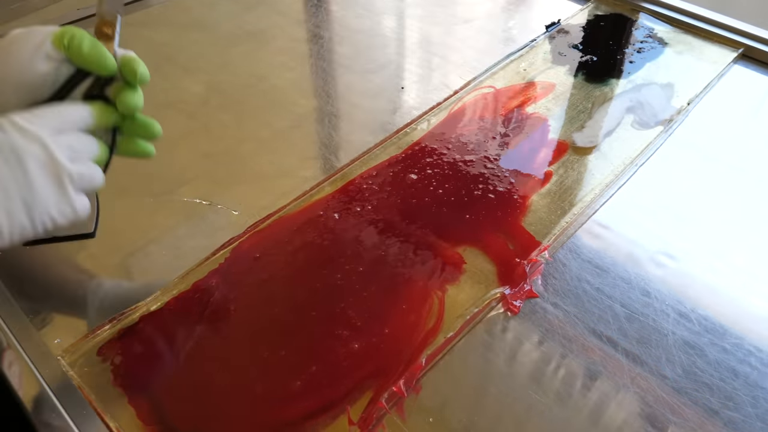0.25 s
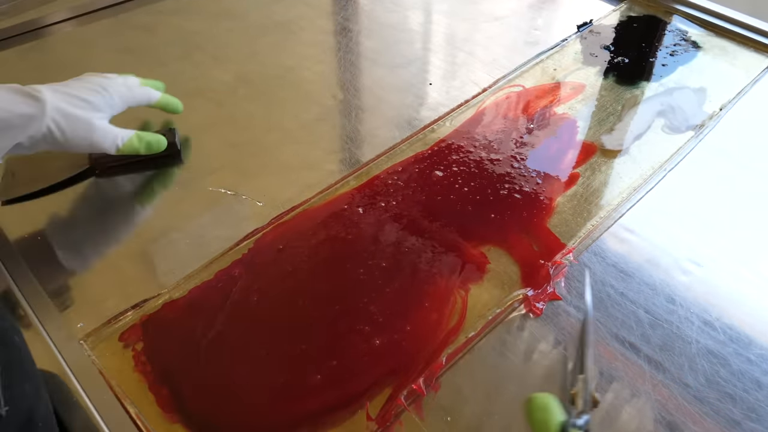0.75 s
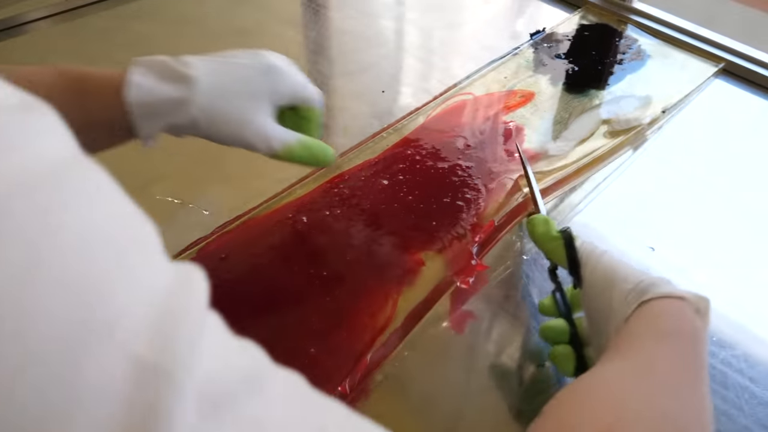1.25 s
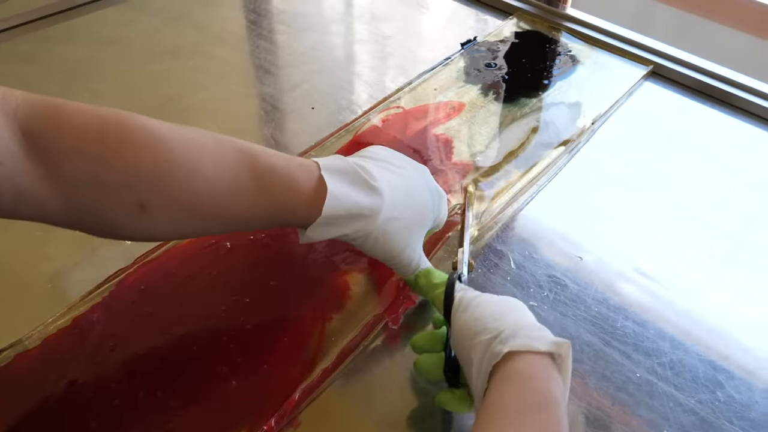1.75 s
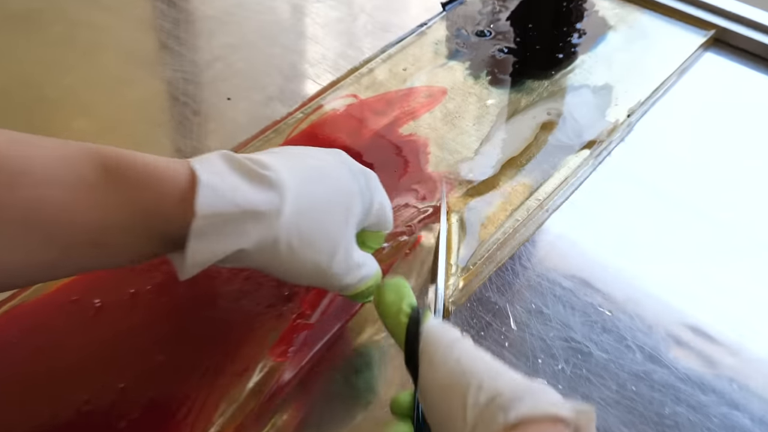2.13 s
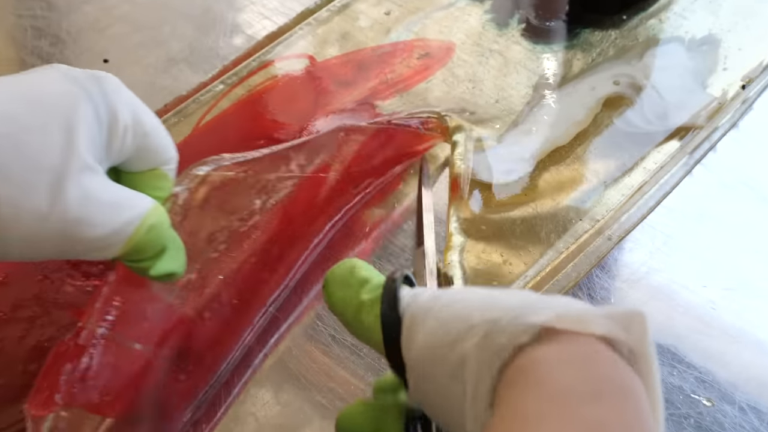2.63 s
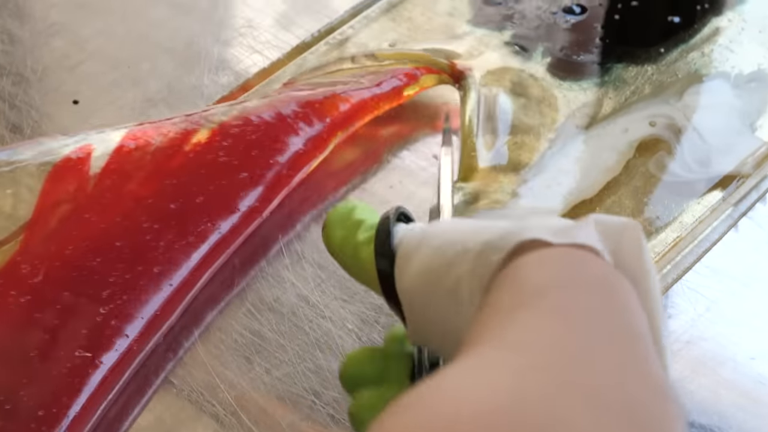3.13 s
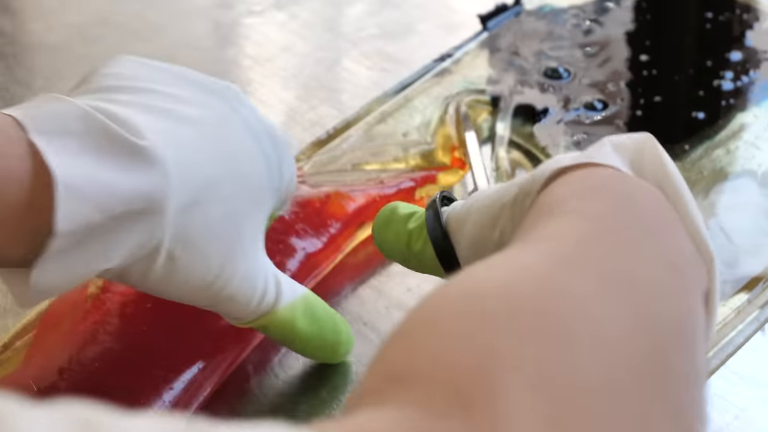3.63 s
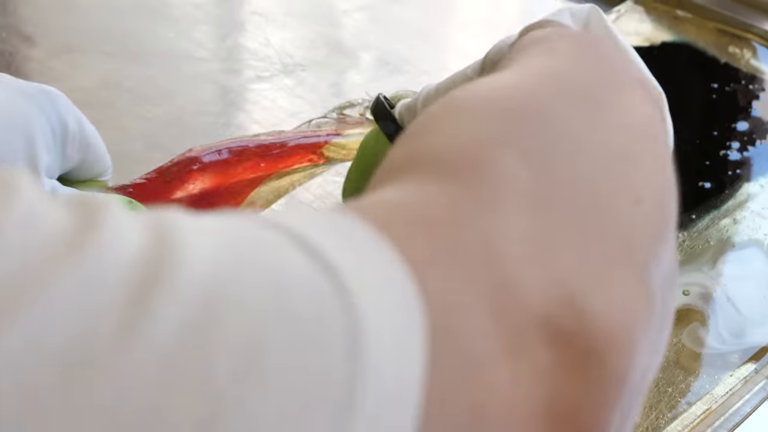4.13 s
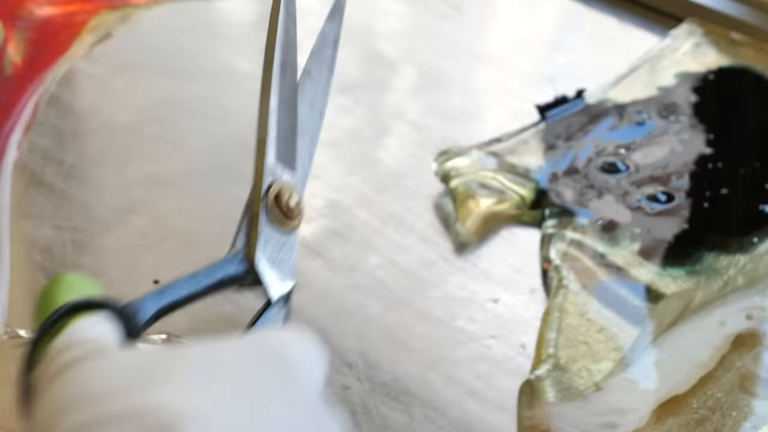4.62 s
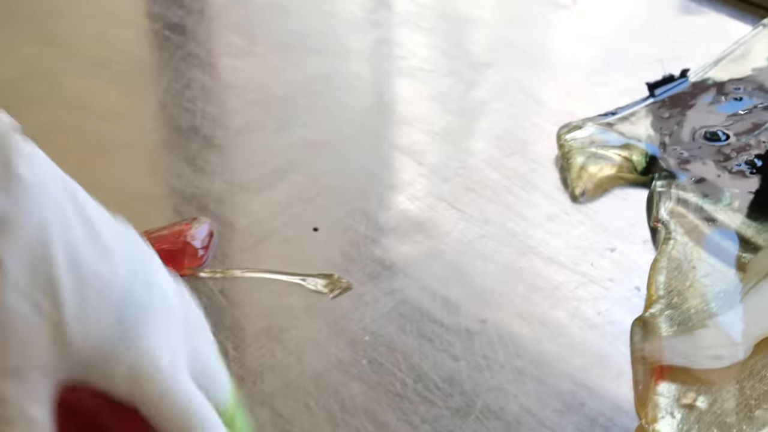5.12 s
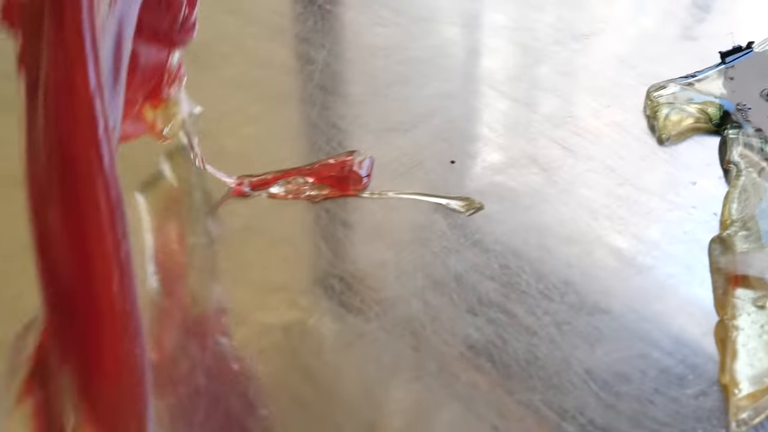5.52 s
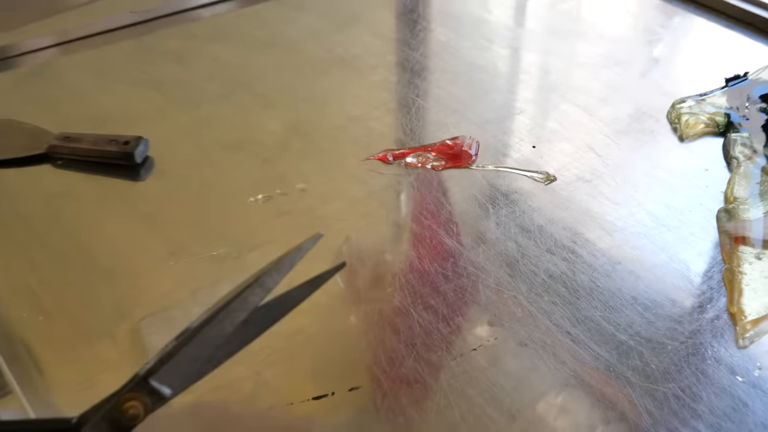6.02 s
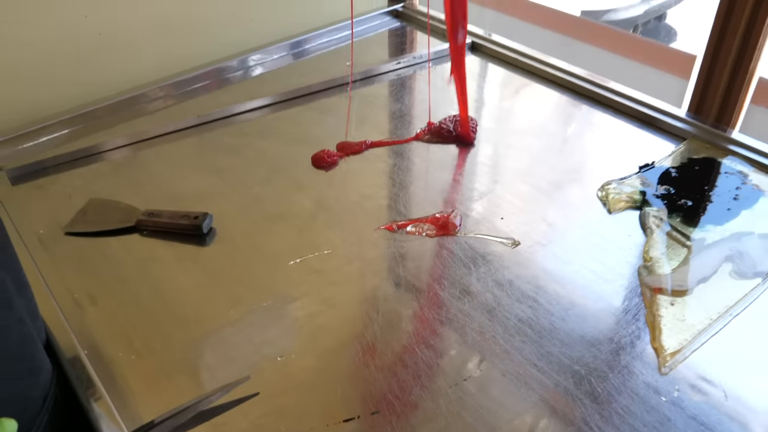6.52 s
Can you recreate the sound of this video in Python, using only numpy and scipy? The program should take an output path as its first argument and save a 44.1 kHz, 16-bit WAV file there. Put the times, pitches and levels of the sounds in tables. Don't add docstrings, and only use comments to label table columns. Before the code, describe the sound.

Close, dry scissor snips with bright metallic cracks, blade scrapes and groaning sheet steel, followed by quiet sticky crackles over a faint ventilation hum.

```python
import sys
import numpy as np
from scipy import signal
from scipy.fft import rfft, irfft, next_fast_len
from scipy.io import wavfile
from scipy.ndimage import uniform_filter1d, map_coordinates

SR = 44100
rng = np.random.default_rng(int(sys.argv[2]) if len(sys.argv) > 2 else 0)


def file_out(sig):
    cols = np.atleast_2d(sig).T
    lim = np.clip(cols, -1, 1)
    pcm = np.round(lim * 32767).astype(np.int16)
    wavfile.write(sys.argv[1], SR, pcm)


def how_loud(loudness_db):
    steps = np.asarray(loudness_db, float) / 20
    return 10 ** steps


N = 298116

# f/Hz, width/Hz, level/dB
SHEET_LOW_MODES = [(104, 8.3, -11), (182, 11, -2.5), (234, 27, -8.5), (281.7, 5.9, 4), (350.5, 8.7, -0.5),
                   (410, 8.5, -15), (523, 5.9, 0), (650, 7.6, -4.5)]
# f/Hz, width/Hz, level/dB
SHEET_MID_MODES = [(904, 8.3, -17.5), (1150, 11, -25.5), (1210, 39, -9), (1228, 11, -3), (1411, 18, -4),
                   (1570, 32, -20)]
# f/Hz, width/Hz, level/dB
BLADE_MODES = [(2260, 610, -7), (2900, 170, -4), (3200, 91, -27), (4600, 90, -19), (5000, 80, -16),
               (5900, 210, -7.5), (7600, 60, -6), (7850, 120, 2), (8200, 110, -9), (8850, 370, 1.5),
               (10000, 140, -35), (12200, 150, -29.5), (10560, 51, -22.5)]


def unit(x):
    return x / np.sqrt(np.mean(x ** 2) + 1e-20)


def along(points, hz):
    f, v = np.transpose(points)
    return np.interp(np.log(hz + 1), np.log(f + 1), v)


def filtered(x, response):
    m = next_fast_len(x.shape[-1] + 8192)
    spectrum = rfft(x, m) * response(np.fft.rfftfreq(m, 1 / SR))
    return irfft(spectrum, m)[..., :x.shape[-1]]


def modes(table):
    def response(f):
        total = 0
        for k, (hz, width_hz, db) in enumerate(table):
            damping = 1j * f * width_hz
            total = total + (-1) ** k * how_loud(db) * damping / (hz * hz - f * f + damping)
        return total
    return response


def blade_gain(f):
    return np.abs(modes(BLADE_MODES)(f))


def gritty(size, grit_db):
    grains = uniform_filter1d(rng.standard_normal(size), size=40)
    return unit(how_loud(grit_db * unit(grains)) * rng.standard_normal(size))


def patchy(x, patchy_db):
    z = signal.stft(x, nperseg=256)[2]
    field = uniform_filter1d(rng.standard_normal(z.shape), size=4, axis=0)
    field = uniform_filter1d(field, size=10, axis=1)
    return signal.istft(z * how_loud(patchy_db * unit(field)), nperseg=256)[1][:len(x)]


def burst(t60_s, response, rise_s=0.000091, size=SR // 4, keep=None):
    t = np.arange(size) / SR
    puff = 0.5 * how_loud(-60 * t / max(t60_s, 0.003))
    spike = 0.33 * how_loud(-60 * t / max(0.18 * t60_s, 0.002))
    blow = rng.standard_normal(size) * (puff + spike) * (1 - np.exp(-t / rise_s))
    sound = filtered(blow[:keep], response)
    return sound / np.abs(sound).max()


def stroke(length_s, rise, fall_db):
    u = np.arange(SR // 2) / SR / length_s
    return np.clip(u / rise, 0, 1) * how_loud(-fall_db * np.clip(u - 0.8, 0, None))


def add(track, s, sound):
    part = track[round(s * SR):][:len(sound)]
    part += sound[:len(part)]


def blade_noise(x, thin=lambda f: 1):
    # f/Hz, density/dB per Hz
    hiss_colour = [(1000, -20.5), (1700, -2), (4000, 1.5), (4660, 1), (9000, 0), (11000, -9.5), (12800, 1),
                   (15000, -7.5)]
    return unit(filtered(x, lambda f: thin(f) * how_loud(along(hiss_colour, f)) * (1 + blade_gain(f))))


def air():
    # f/Hz, density/dB per Hz
    air_colour = [(12, -29), (20, 1), (48, 3.5), (72, -2.5), (146, -0.5), (255, 1.5), (293, -1.5),
                  (337, 1.5), (718, -3), (923, -4.5), (1120, -11), (1400, -9), (6910, -24), (8650, -32.5),
                  (16000, -42)]
    return how_loud(-55.5) * unit(filtered(rng.standard_normal(N), lambda f: how_loud(along(air_colour, f))))


def rubbing():
    # t/s, sliding speed level/dB, sheet pressure level/dB
    rub_path = [(0.0, -59.5, -59), (0.73, -57, -53), (0.88, -43.5, -38), (1.0, -43, -58.5),
                (1.17, -45.5, -45), (1.34, -55, -54.5), (1.6, -57, -51.5), (2.331, -51, -48.5),
                (2.6, -51, -49), (2.77, -44, -54.5), (2.94, -50, -45.5), (3.3, -53.5, -55),
                (3.6, -50.5, -49.5), (3.74, -45, -53), (3.84, -58, -53.5), (4.33, -54, -59.5),
                (4.37, -46, -48), (4.48, -39, -49.5), (4.65, -58.5, -56), (5.55, -60.5, -54.5),
                (6.76, -70, -65)]
    s, *cols = np.transpose(rub_path)
    speed_db, press_db = [np.interp(np.arange(N) / SR, s, c) for c in cols]
    mean_db = speed_db.mean()
    sizzle_db = mean_db - 5 + 1.19 * (speed_db - mean_db)
    drag = blade_noise(patchy(gritty(N, grit_db=2.5), 5.0))

    snags_per_s, size_spread_db = 70, 3
    hits = rng.random(N) < snags_per_s / SR
    hits = hits * how_loud(size_spread_db * np.minimum(rng.exponential(size=N), 2))
    puffs = signal.lfilter([1], [1, -0.96], hits) * rng.standard_normal(N)
    drag = drag + how_loud(-14) * blade_noise(patchy(puffs, 6.6))

    split = lambda f: 1 / (1 + (f / 7000) ** 6)
    hiss = how_loud(speed_db) * unit(filtered(drag, split))
    sizzle = how_loud(sizzle_db) * unit(filtered(drag, lambda f: 1 - split(f)))
    mid_sheet = lambda f: modes(SHEET_MID_MODES)(f) + modes([(1100, 1200, -6)])(f)
    low_sheet = lambda f: modes(SHEET_LOW_MODES)(f) + modes([(400, 600, -9)])(f)
    mid_hum = how_loud(press_db) * unit(filtered(gritty(N, grit_db=2.5), mid_sheet))
    low_hum = how_loud(press_db - 6.5) * unit(filtered(gritty(N, grit_db=3.0), low_sheet))
    return hiss + sizzle + mid_hum + low_hum


def hums():
    # t/s, length/s, level/dB
    lean_events = [
        (0.789, 0.04, -38.5),
        (1.51, 0.3, -52),
        (2.084, 0.11, -47.5),
        (4.99, 0.07, -55),
        (2.762, 0.13, -48),
        (3.271, 0.13, -45.5),
        (3.359, 0.036, -46),
        (3.816, 0.25, -52),
    ]
    # t/s, length/s, f/Hz, level/dB
    tone_events = [(0.099, 0.0087, 2900, -35.5), (0.405, 0.15, 234, -56.5), (.9, 0.24, 182, -54),
                   (0.988, 0.018, 904, -36.5), (1.134, 0.056, 359.4, -43.5), (1.342, .05, 410, -46.5),
                   (1.752, 0.024, 356, -43), (2.769, 0.05623, 523, -43.5), (2.782, 0.062, 1411, -44),
                   (3.351, 0.053, 1270, -42), (2.837, 0.01, 4710, -31), (3.361, 0.016, 4610, -33)]
    # t/s, length/s, f/Hz, level/dB
    thud_events = [
        (1.203, 0.14, 94.5, -58),
        (1.75, 0.04, 200, -46.5),
        (2.1, 0.2, 156, -53.5),
        (2.8, 0.11, 114, -54.5),
        (4.004, 0.03, 706, -46),
        (4.341, 0.0058, 803.8, -28.5),
        (4.633, 0.051, 338.8, -44),
        (4.862, 0.02, 1332, -46),
        (5.211, 0.01, 720, -46),
        (5.437, 0.038, 270, -52),
    ]
    # t/s, length/s, f/Hz, width/Hz, level/dB
    blade_ring = (4.49, 0.18, 2770, 400, -53.5)
    out = np.zeros(N)
    rows = [(s, length_s, 275, 17.93, db) for s, length_s, db in lean_events]
    rows += [(s, length_s, hz, 12 + 0.033 * hz, db) for s, length_s, hz, db in tone_events]
    rows += [(s, length_s, hz, 0.57 * hz, db) for s, length_s, hz, db in thud_events]
    for s, length_s, hz, width_hz, db in rows + [blade_ring]:
        tone = filtered(rng.standard_normal(SR // 2), lambda f: modes([(hz, width_hz, 0)])(f) ** 2)
        tone = tone / np.std(tone[:round(length_s * SR)])
        add(out, s, how_loud(db) * stroke(length_s, 0.072, 15.4) * tone)
    return out


def snaps():
    # t/s, peak/dB, body/dB, wash/dB, lift of the 3 and 11 kHz modes/dB
    snap_events = [
        (0.1003, -19.5, -27, -31, -7),
        (1.5945, -22, -3, -35, -17),
        (1.9141, 2.5, -22.5, -22.5, -1),
        (2.6015, 1, -18.5, -29, 5.5),
        (2.6045, -11, -39, -33.5, 2.5),
        (3.0993, 1, -20, -24.5, 0.5),
        (3.5843, 1, -18.5, -21.5, 8),
        (4.347, 7, -32.5, -26.5, 0),
    ]
    # f/Hz, density/dB per Hz
    crack_colour = [(880, -35.5), (1500, -21), (2300, 6), (3200, 9.5), (3840, 2), (4400, 9), (6400, 2),
                    (7700, 9), (11300, 3), (14800, 0.5)]
    # f/Hz, density/dB per Hz
    wash_colour = [(300, -76.5), (880, -42.5), (1500, -25.5), (1880, 7.5), (2140, -3.5), (2770, 6),
                   (3690, -4.5), (4420, 0.5), (6240, -12.5), (11200, 3.5), (14500, -18), (16000, -21)]
    out = np.zeros(N)
    for s, db, body_db, wash_db, lift_db in snap_events:
        t60_s = 0.023 * how_loud(-0.5 * db)
        lift_modes = modes([(3150, 1200, 0), (11200, 2200, -0.5)])
        lift = lambda f: how_loud(lift_db * np.abs(lift_modes(f)) ** 2)
        crack = burst(t60_s, lambda f: how_loud(along(crack_colour, f)) * lift(f) * (1 + 0.5 * blade_gain(f)))
        knock = burst(0.045, modes([(506, 940, -14.5), (900, 4100, 8.5), (1650, 1700, 15.5)]))
        shimmer = lambda f: 1 + 0.3 * blade_gain(f) + 0.36 * np.abs(modes([(11400, 900, 0)])(f))
        wash_response = lambda f: how_loud(along(wash_colour, f)) * lift(f) * shimmer(f)
        wash = burst(0.63, wash_response, rise_s=0.002, size=SR // 2)
        add(out, s, how_loud(db - 1) * (crack + how_loud(body_db) * knock))
        add(out, s, how_loud(db - 2 + wash_db) * wash)
    return out


def shop(x):
    # f/Hz, t60/s
    room_t60 = [(300, 0.19), (800, 0.15), (2500, 0.36), (6000, 0.46), (14000, 0.23)]
    out, step = np.zeros(N), SR // 3
    for start in range(0, N, step):
        hz, t, z = signal.stft(rng.standard_normal(SR // 2), SR, nperseg=256)
        decay = how_loud(-60 * t / along(room_t60, hz)[:, None])
        tail = signal.istft(z * decay, SR, nperseg=256)[1]
        echo = signal.fftconvolve(x[start:start + step], tail / np.linalg.norm(tail))
        add(out, start / SR + 0.0062, echo)
    return out


def pricks():
    # t/s, peak/dB
    prick_events = [(.261, -36), (.2665, -37), (.288, -41), (.3336, -38), (.3652, -39), (.3782, -36),
                    (.387, -35), (.3925, -36), (.404, -36), (.413, -35), (1.5947, -19), (1.6172, -28),
                    (1.6578, -25), (2.2816, -13), (2.2841, -15)]
    out = np.zeros(N)
    for s, db in prick_events:
        add(out, s, how_loud(db) * burst(0.009, modes([(2300, 1800, 0), (7800, 3000, -6)]), size=1024))
    return out


def bright(hz, lift_db, width):
    wide = modes([(5000, 14000, 0.012)])
    peak = modes([(hz, width * hz, lift_db)])
    return lambda f: (wide(f) + peak(f)) * modes([(7000, 16000, 0)])(f)


def landings():
    # t/s, peak/dB, sheet low/dB, sheet mid/dB, bright f/Hz
    landing_events = [(0.3875, -49, 13, 15, 3213), (0.7907, -2.5, -26.5, -18.5, 8570),
                      (0.863, -17, -12, -24, 4256), (0.9863, -4, -26.5, -16.5, 5970),
                      (1.1467, -27, -24, -5.5, 8100), (1.343, -27.5, -10.5, -21, 2140),
                      (1.7407, -17, -19.5, -9, 2261), (2.0809, -8, -23, -11.5, 7930),
                      (2.419, -31, -15.5, 0.5, 2637), (2.7665, -4.5, -26, -11.5, 7830),
                      (3.261, -12.5, -20.5, -10.5, 4600), (3.431, -31, -7.5, -27, 6450),
                      (3.8117, -24, -12.5, -1, 4770), (4.3404, -10.5, -28, -17, 8640),
                      (4.6372, -50.5, 17.5, -34.5, 2830)]
    out = np.zeros(N)
    boom = lambda f: modes([(350, 700, 0)])(f) ** 2
    clank = lambda f: modes([(1200, 1500, 0)])(f) ** 2
    for s, db, low_db, mid_db, hz in landing_events:
        low = burst(0.018, modes(SHEET_LOW_MODES)) + 1.18 * burst(0.57, boom)
        mid = burst(0.049, modes(SHEET_MID_MODES)) + 2.75 * burst(0.095, clank)
        crack = burst(0.061, bright(hz, 7.4, width=0.01))
        add(out, s, how_loud(db - 2.5) * (crack + how_loud(low_db) * low + how_loud(mid_db - 7.0) * mid))
    return out


def rustles():
    # t/s, length/s, level/dB, centre f/Hz
    rustle_events = [
        (2.87, 0.08, -47, 2500),
        (0.397, 0.19, -51, 2420),
        (4.981, 0.097, -51, 2930),
        (5.205, 0.02, -49, 3500),
        (5.272, 0.036, -50.5, 2950),
        (5.49, 0.11, -47, 3600),
        (5.699, 0.086, -52.5, 2912),
        (3.93, 0.14, -46, 6500),
    ]
    out = np.zeros(N)
    for s, length_s, db, hz in rustle_events:
        grit = patchy(gritty(SR // 2, grit_db=5.5), 1.5)
        crackle = filtered(grit, lambda f: modes([(hz, 1.1 * hz, 0)])(f) ** 2)
        add(out, s, how_loud(db) * stroke(length_s, 0.11, 50) * unit(crackle))
    return out


def ticks():
    # t/s, peak/dB, weight behind the touch/dB
    steel_ticks = [(.6296, -29, -1), (1.5115, -23.5, -3.5), (1.6162, -41.5, 8), (1.6306, -24, -3.5),
                   (1.6566, -42.5, -11), (1.6666, -22, -5.5), (1.703, -32, -5), (1.7515, -22, -1),
                   (2.5121, -34, -5), (2.56, -28.5, 0), (2.861, -20, -3), (3.9205, -33, -4),
                   (4.2245, -35, -8), (4.2864, -24.5, -9), (4.3174, -21.5, -8), (4.421, -27, 3),
                   (4.667, -34, -5), (4.689, -31, -8), (4.782, -34, -6.5), (4.809, -30, -17),
                   (4.8333, -29, -10.5), (5.3125, -27.5, -1.5), (5.688, -38.5, -4.5), (5.8313, -42.5, -13),
                   (5.8463, -29, -14.5), (6.0191, -36.5, -7.5), (6.081, -38.5, -14.5), (6.328, -36.5, -1.5),
                   (6.6893, -50, -11.5), (1.56, -44, -3.5)]
    # t/s, peak/dB, sharpness/dB
    sugar_ticks = [(0.727, -31, -17), (2.2815, -23, -3), (2.8095, -37, -4), (3.3628, -34, 18.5),
                   (3.973, -31, 8.5), (4.0005, -24, 1.5), (4.891, -38, -2.5), (4.976, -32, -24),
                   (4.994, -21.5, -2.5), (5.0255, -27.5, -5), (5.0977, -37, 3.5), (5.141, -33, -27),
                   (5.436, -24, -18), (5.876, -37, -7), (5.175, -53, -25)]
    # t/s, peak/dB, sharpness/dB
    glove_ticks = [(.457, -22, -5), (1.3008, -29, -0.5), (2.2374, -25, -11), (2.2682, -17, -8),
                   (2.9112, -32, -19), (4.8605, -29, -7.5), (5.0365, -31.5, -20), (5.202, -37, -14.5),
                   (5.2107, -31.5, -1.5), (5.2655, -34, -1.5), (5.276, -33, -1.5), (5.4979, -32.5, -10.5),
                   (6.1535, -39, -17), (6.636, -36, -24.5), (1.475, -43, -20)]
    out = np.zeros(N)
    band = lambda hz, width_hz: lambda f: modes([(hz, width_hz, 0)])(f) ** 3
    tip_hz = 6760
    # t/s, peak/dB, body/dB, middle/dB, top/dB, t60/s, top f/Hz; lighter steel touches sound higher
    rows = [(s, db, w, -3.5 + 0.7 * w, 0, 0.036, tip_hz * how_loud(-0.44 * w)) for s, db, w in steel_ticks]
    rows += [(s, db, -5.5, 0, sharp_db, 0.03, tip_hz) for s, db, sharp_db in sugar_ticks]
    rows += [(s, db, 0, -11.5, sharp_db, 0.044, tip_hz) for s, db, sharp_db in glove_ticks]
    for s, db, body_db, middle_db, top_db, t60_s, hz in rows:
        body = how_loud(body_db) * burst(t60_s, band(1316, 2000), keep=SR // 10)
        middle = how_loud(middle_db) * burst(t60_s, band(3830, 4700), keep=SR // 10)
        top = how_loud(top_db) * burst(t60_s, band(hz, 8800), keep=SR // 10)
        add(out, s, how_loud(db - 2.0) * (body + middle + top))
    return out


def snags():
    # t/s, peak/dB, centre f/Hz
    snag_events = [(.505, -35, 7050), (.76, -37, 5000), (0.9075, -30, 2130), (.9625, -22, 12900),
                   (1.1954, -25.5, 2560), (1.4891, -38.5, 7490), (1.5111, -33.5, 8400),
                   (1.6163, -36.5, 13470), (1.6303, -30, 8380), (1.644, -36, 13550), (1.657, -31, 13300),
                   (1.6667, -27, 13440), (1.684, -34, 8000), (1.7036, -29, 8140), (1.716, -32.5, 8000),
                   (2.7325, -27.5, 8500), (2.8266, -22.5, 7010), (2.8377, -17, 7040), (2.852, -17.5, 7490),
                   (2.98, -36, 1500), (3.0038, -38.5, 2200), (3.035, -33, 993.6), (3.56, -34, 10000),
                   (3.723, -38, 9050), (3.994, -29, 3000), (3.973, -25, 4900), (3.9818, -25, 5000),
                   (3.9818, -23, 13070), (4.17, -36, 7910), (4.189, -36, 3550), (3.997, -27, 4800),
                   (4.496, -33.5, 8021), (4.8742, -35, 3500), (5.0974, -30.5, 5500), (5.11, -36.5, 5960),
                   (5.3801, -40, 8100), (5.4226, -45, 5630), (5.447, -39, 3900), (5.4794, -43, 5000),
                   (5.5153, -36, 4010), (6.12, -43.5, 9200), (6.52, -48, 2506)]
    out = np.zeros(N)
    for s, db, hz in snag_events:
        add(out, s, how_loud(db) * burst(0.034, lambda f: modes([(hz, 0.33 * hz, 0)])(f) ** 2, size=2048))
    return out


def slides():
    # t/s, length/s, level/dB, singing f/Hz, sheet/dB
    slide_events = [(0.669, 0.041, -38, 8030, -13), (0.863, 0.015, -36.5, 4600, 7.5),
                    (0.932, 0.06, -34.5, 12900, -37), (0.996, 0.051, -35, 4550, -19),
                    (1.088, 0.064, -39, 4600, -39), (1.191, 0.055, -36.5, 9250, -8),
                    (1.334, 0.048, -38, 7850, -4.5), (1.637, 0.0601, -41, 8100, -5),
                    (1.746, 0.063, -42, 8200, 1.5), (2.039, 0.029, -37, 2300, -35),
                    (2.192, 0.081, -39, 5000, -24), (2.284, 0.026, -34, 2710, -8),
                    (2.728, 0.024, -42, 8200, -12), (2.807, 0.077, -31.5, 4700, -15),
                    (3.223, 0.057, -39.5, 4205, -71), (3.3, 0.03169, -40, 4300, -12),
                    (3.353, 0.058, -33, 4600, -13), (3.409, 0.053, -41.5, 3720, -1.5),
                    (3.971, 0.06, -38, 12900, -13), (4.164, 0.039, -47.5, 8600, -4),
                    (5.835, 0.023, -49, 9300, -30)]
    out = np.zeros(N)
    sheet = lambda f: modes(SHEET_MID_MODES + SHEET_LOW_MODES)(f) + modes([(800, 1100, -5)])(f)
    for s, length_s, db, hz, sheet_db in slide_events:
        clumps = how_loud(2.2 * unit(uniform_filter1d(rng.standard_normal(SR // 2), size=250)))
        grit = clumps * gritty(SR // 2, grit_db=-2.0)
        others = [(mode_hz, 120, rng.normal(-29.5, 3.4)) for mode_hz, _, _ in BLADE_MODES]
        song = unit(filtered(grit, modes([(hz, 180, 0)] + others)))
        hum = unit(filtered(grit, sheet))
        thin = lambda f: 1 - 0.3 / (1 + (f / min(hz, 4300)) ** 12)
        hiss = blade_noise(patchy(grit, 3.1), thin)
        add(out, s, how_loud(db) * stroke(length_s, 0.12, 39) * (hiss + 0.44 * song + how_loud(sheet_db) * hum))
    return out


def clinks():
    # t/s, f/Hz, peak/dB
    clink_events = [(0.7902, 372, -21), (0.7909, 1460, -26), (0.7902, 4470, -13), (.7905, 5000, -23),
                    (.7905, 7750, -19), (.7905, 12890, -17), (.9865, 2200, -30), (.9865, 7603, -18),
                    (.9865, 8253, -15), (1.914, 1540, -11.5), (1.915, 2500, -11.5), (1.914, 3160, -22.5),
                    (1.915, 7400, -10), (2.0813, 2420, -19), (2.0813, 7959, -26), (2.603, 674, -23.5),
                    (2.602, 2970, -11), (2.6015, 5900, -11.5), (2.6044, 11000, -8), (2.6015, 13990, -18.5),
                    (2.7665, 2720, -12.5), (2.7665, 13470, -11), (3.0996, 3250, -10.5), (3.0989, 7937, -11),
                    (3.0996, 13600, -12), (3.5844, 770, -23), (3.5844, 2143, -24), (3.5846, 9000, -18),
                    (3.586, 9700, -11.5), (3.5866, 11200, -8), (3.5848, 3150, -14), (3.5844, 12800, -17),
                    (4.3403, 857, -14), (4.348, 4340, -10.5), (4.3471, 5070, -6.5), (4.3471, 10900, -20),
                    (4.3471, 12400, -17), (1.7515, 220, -28), (2.8095, 2900, -27), (2.8612, 2300, -23),
                    (2.888, 2500, -31), (2.897, 2350, -33), (2.9122, 2500, -27), (2.9341, 2300, -32),
                    (2.945, 2250, -34), (4.0015, 720, -25), (4.8572, 1400, -24), (5.2015, 2500, -35),
                    (5.3125, 1250, -33)]
    out, t = np.zeros(N), np.arange(SR // 20) / SR
    for s, hz, db in clink_events:
        t60_s = 0.012 + 3 / hz
        ring = np.sin(2 * np.pi * hz * t) * (1 - np.exp(-t / 0.00033))
        add(out, s, how_loud(db - 60 * t / t60_s) * ring)
    return out


def singing():
    # t/s, length/s, f/Hz, level/dB
    singing_events = [(.81, .1, 622, -52), (.81, 0.16, 904, -51), (.852, .012, 4750, -41),
                      (1.0, 0.11, 1300, -51.5), (2.277, 0.054, 1278, -46), (2.284, 0.0615, 1020, -54.5),
                      (2.41, 0.053, 1227, -51), (2.416, .08, 1012, -54), (2.439, 0.14, 279.5, -53.5),
                      (2.486, 0.1026, 1396, -51.5), (2.496, 0.098, 1259, -51), (2.794, 0.064, 1270, -56),
                      (2.829, 0.096, 1219, -45), (2.801, 0.13, 702.4, -54), (2.917, 0.049, 1025, -45.5),
                      (2.86, .1, 1150, -48), (.934, .035, 2700, -50), (3.27, 0.072, 530.4, -52.5),
                      (3.275, 0.077, 708, -54), (3.268, 0.042, 1214, -44.5), (3.357, 0.055, 1254, -40.5),
                      (3.359, 0.07, 525, -54), (3.42, 0.058, 1133, -47.5), (3.432, .13, 1073, -50.5),
                      (3.451, 0.11, 274.7, -55.5), (3.82, 0.14, 1231, -56), (4.354, 0.0963, 2540, -47.5),
                      (4.44, 0.12, 2815, -55), (4.637, 0.018, 480, -46.5), (5.438, 0.096, 278, -61),
                      (1.935, 0.09, 7019, -54), (1.93, .08, 9100, -51), (3.125, 0.12, 7067, -56),
                      (3.12, .08, 9990, -55), (3.6, .1, 9517, -52), (4.36, 0.11, 11840, -51),
                      (2.62, 0.096, 9400, -47)]
    out, t = np.zeros(N), np.arange(SR // 2) / SR
    for s, length_s, hz, db in singing_events:
        knots = rng.standard_normal((2, 34))
        drift, flutter = [map_coordinates(row, [60 * t]) for row in knots]
        phase = 2 * np.pi * hz * np.cumsum(1 + 0.005 * drift) / SR
        add(out, s, how_loud(db + 3.5 + 4 * flutter) * stroke(length_s, 0.12, 30) * np.sin(phase))
    return out


def groans():
    # t/s, level/dB, f/Hz
    groan_paths = [
        [(2.09, -38, 1320), (2.14, -48, 1307), (2.22, -42, 1320)],
        [(2.42, -44, 1189), (2.568, -43, 1315), (2.59, -50, 1300)],
        [(2.78, -31, 1470), (2.79, -46, 1374), (3.08, -47, 992)],
        [(3.27, -41, 1231), (3.506, -40.5, 1136), (3.57, -55, 1020)],
        [(3.82, -41, 1220), (3.858, -56, 1278), (4.06, -38.5, 1324)],
    ]
    out = np.zeros(N)
    for path in groan_paths:
        s, db, hz = np.transpose(path)
        t = np.arange(s[0], s[-1], 1 / SR)
        flutter = filtered(gritty(len(t), grit_db=5), lambda f: 1 / (1 + (f / 100) ** 2))
        tone = np.sin(2 * np.pi * np.cumsum(np.interp(t, s, hz)) / SR)
        level = how_loud(np.interp(t, s, db)) * signal.windows.tukey(len(t), 0.15)
        add(out, s[0], level * unit(flutter * tone))
    return out


def scene():
    blows = snaps() + landings() + ticks()
    mid = air() + rubbing() + hums() + blows + how_loud(-13.5) * shop(blows)
    mid = mid + pricks() + rustles() + snags() + slides()
    mid = mid + clinks() + singing() + how_loud(-4) * groans()
    side = how_loud(-33) * filtered(np.roll(blows, 30), modes([(10000, 30000, 0)]))
    return np.array([mid + side, mid - side])


def low_pass(x):
    return signal.sosfilt(signal.butter(12, 16440, fs=SR, output="sos"), x)


def record(dry):
    # from t/s, to t/s, level/dB
    bass_duck = (4.352, 4.421, -9)
    from_s, to_s, duck_db = bass_duck
    dip = lambda f: 1 - 0.24 * np.abs(modes([(3700, 500, 0)])(f))
    top = lambda f: 1 / (1 + (f / 15900) ** 60)
    heard = filtered(dry, lambda f: dip(f) * top(f))
    t = np.arange(N) / SR
    ducked = uniform_filter1d(1.0 * (t > from_s) * (t < to_s), size=60)
    bass = filtered(heard, lambda f: 1 / (1 + (f / 2000) ** 8))
    heard = heard - (1 - how_loud(duck_db)) * ducked * bass
    excess = heard - heard / (1 + np.abs(heard) ** 8) ** (1 / 8)
    return low_pass(heard - filtered(excess, lambda f: f > 400))


dry = scene()
out = record(dry)
file_out(out)
```